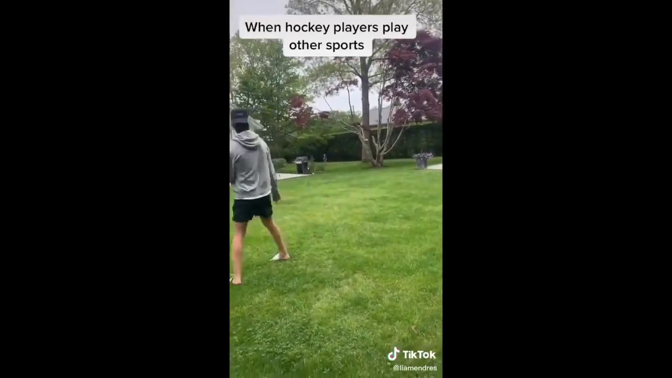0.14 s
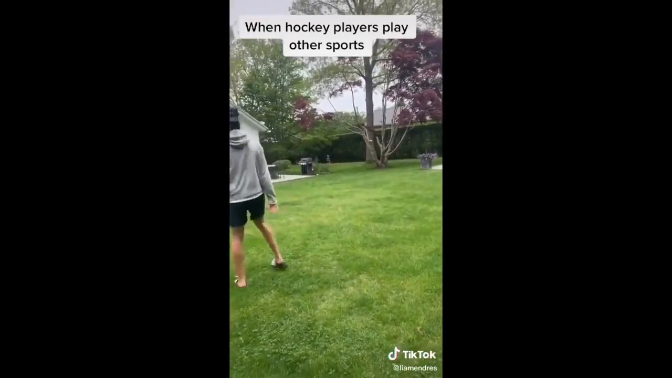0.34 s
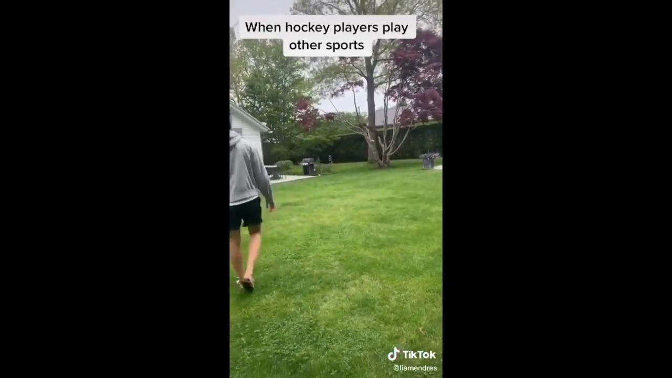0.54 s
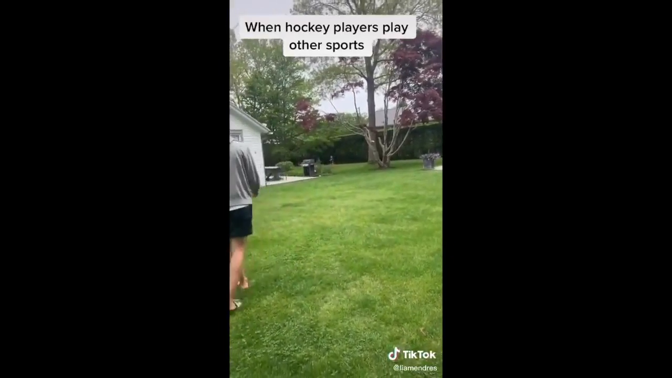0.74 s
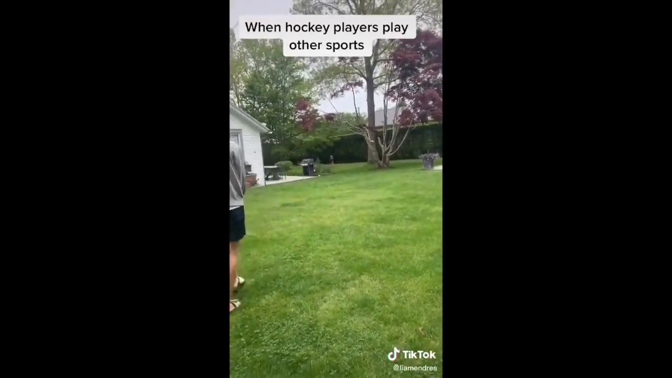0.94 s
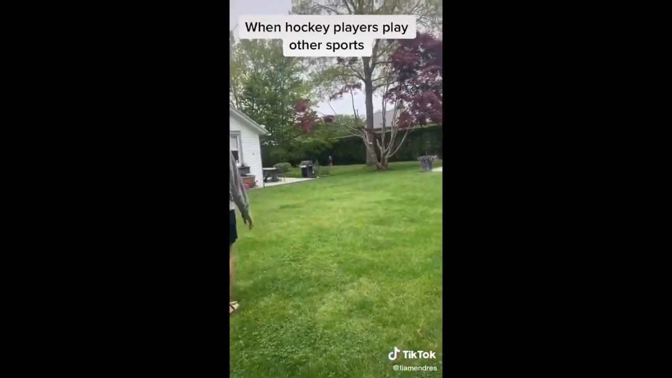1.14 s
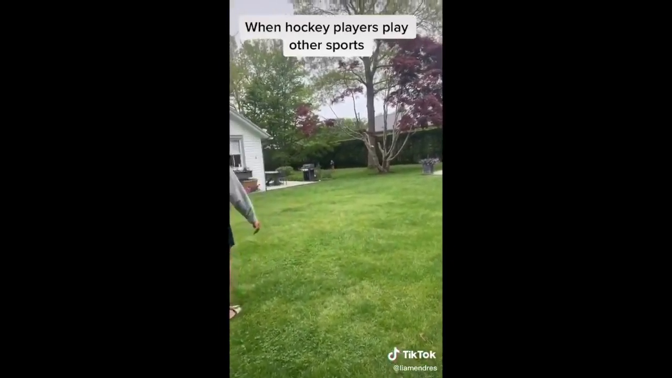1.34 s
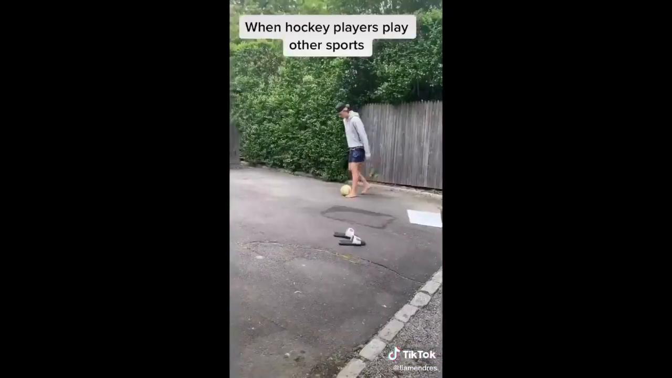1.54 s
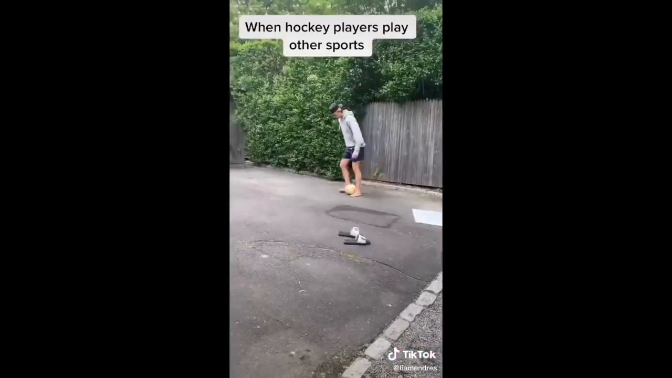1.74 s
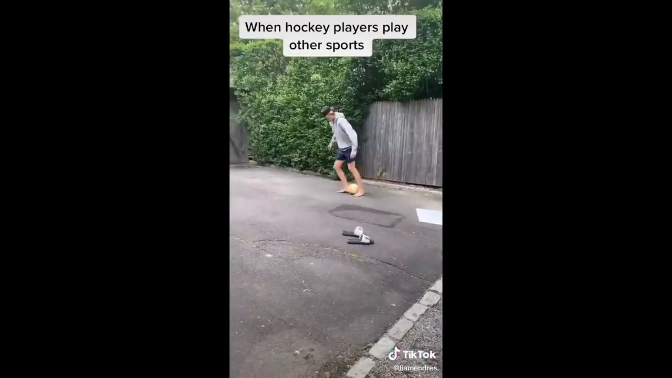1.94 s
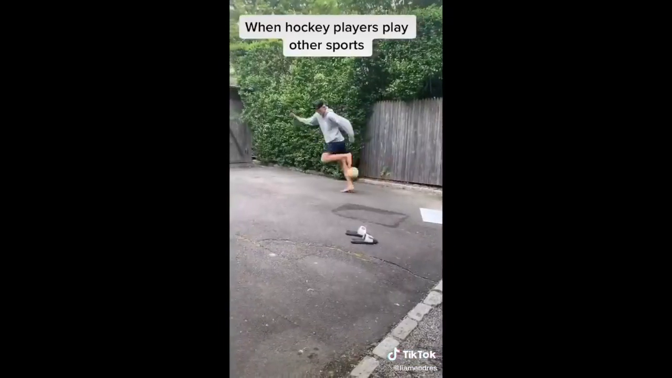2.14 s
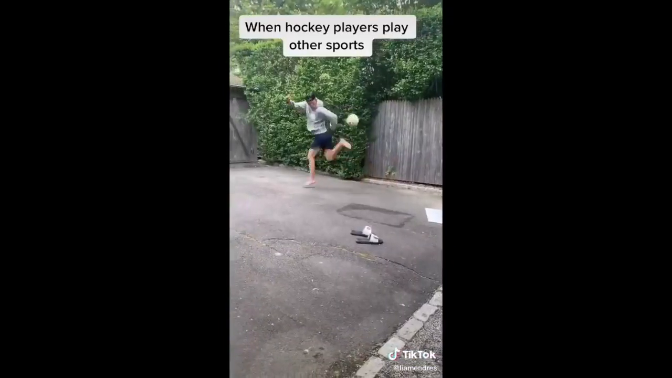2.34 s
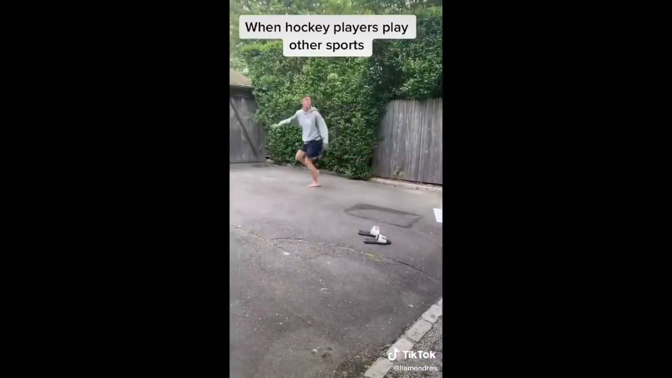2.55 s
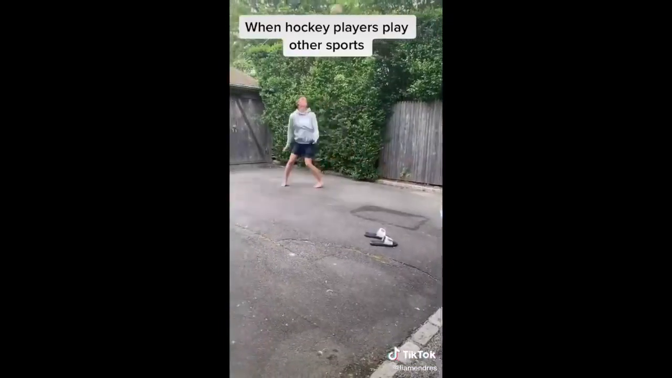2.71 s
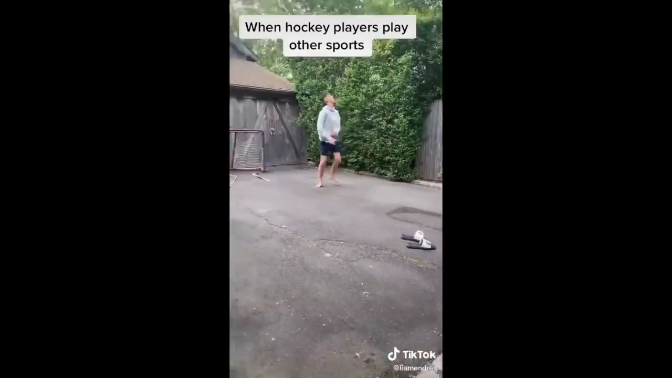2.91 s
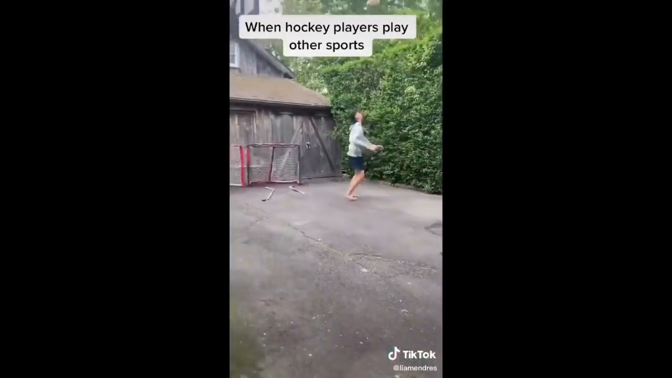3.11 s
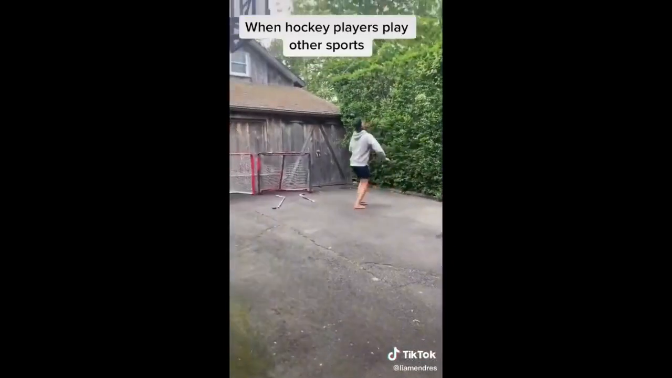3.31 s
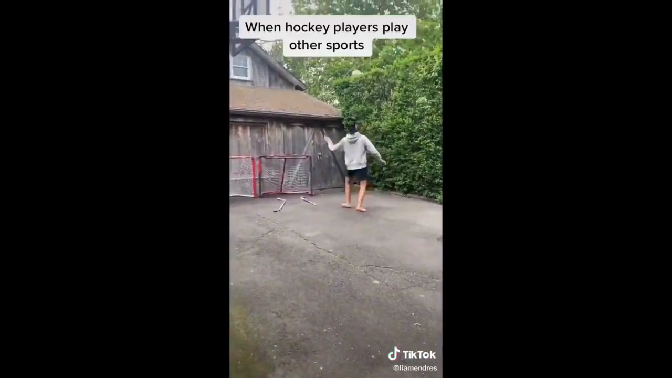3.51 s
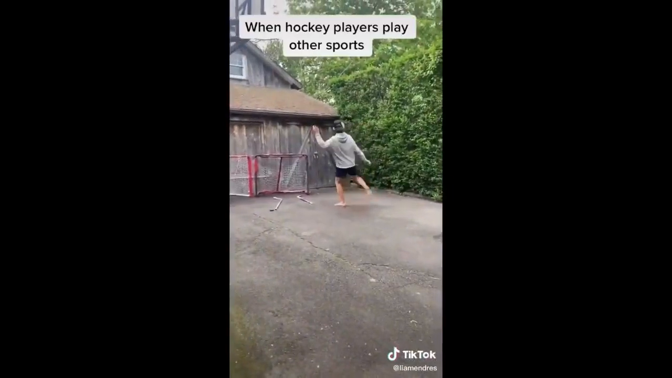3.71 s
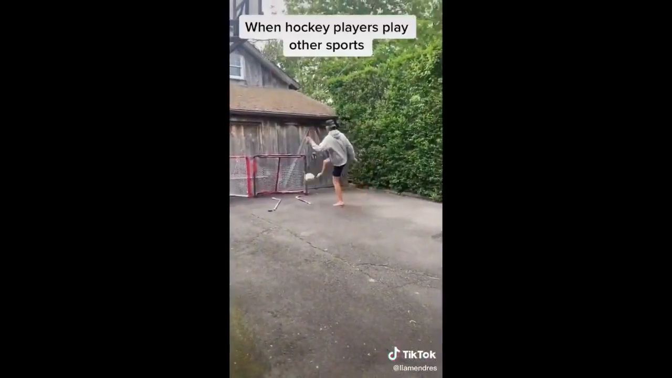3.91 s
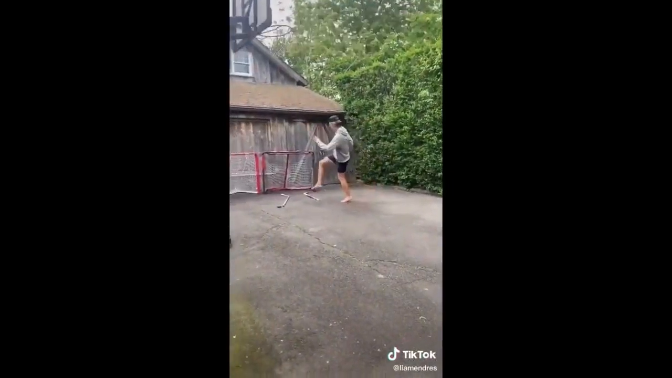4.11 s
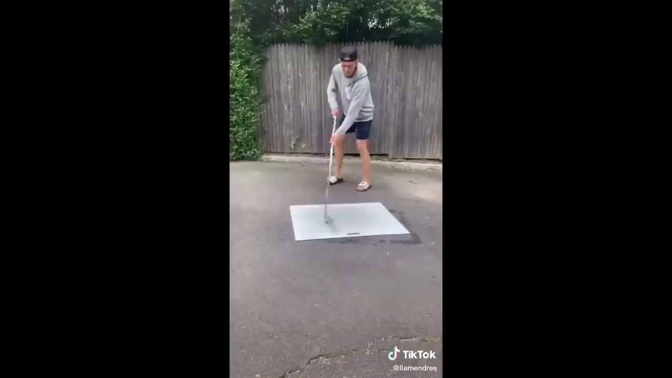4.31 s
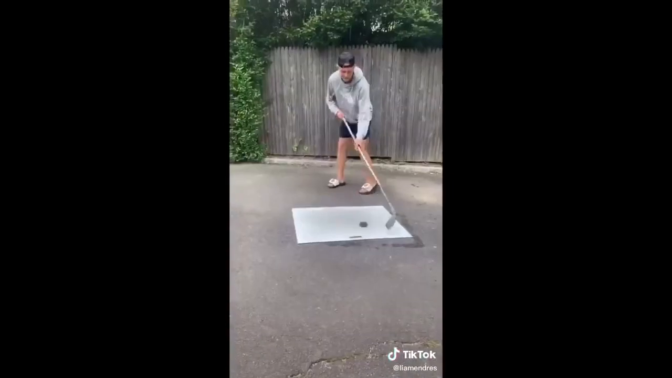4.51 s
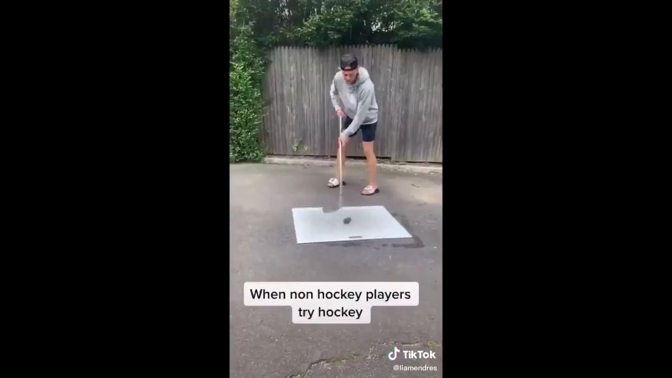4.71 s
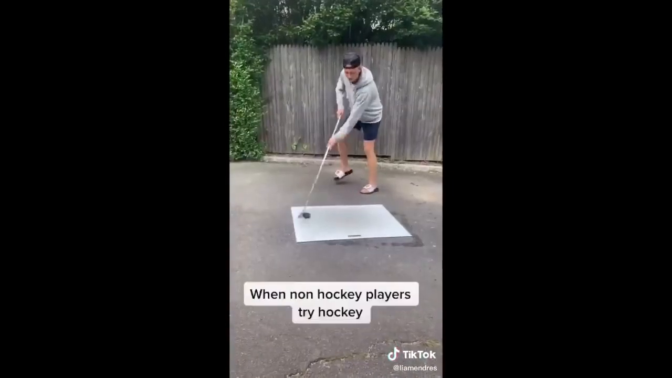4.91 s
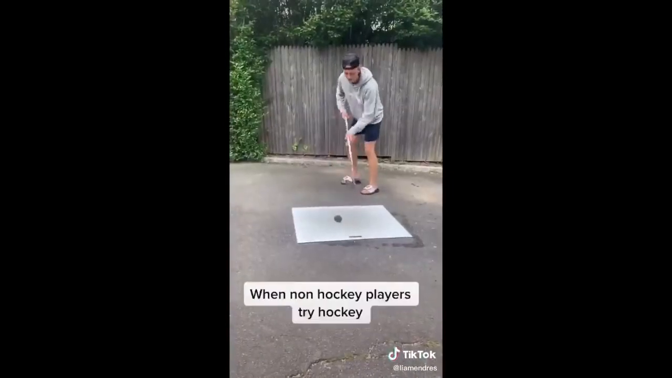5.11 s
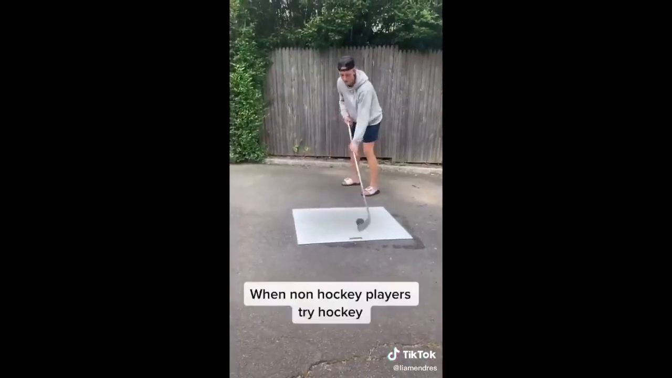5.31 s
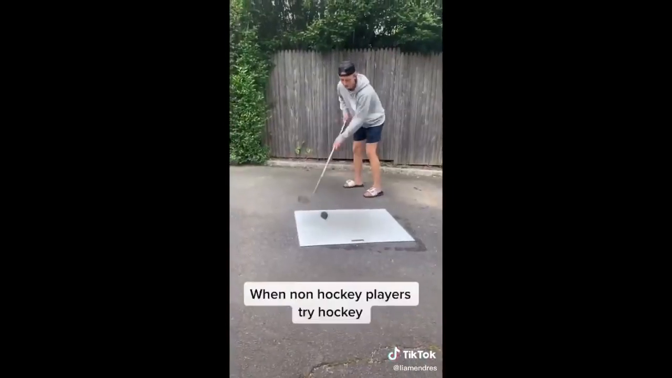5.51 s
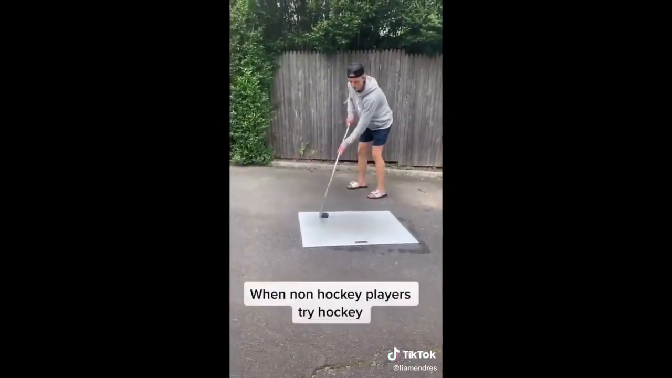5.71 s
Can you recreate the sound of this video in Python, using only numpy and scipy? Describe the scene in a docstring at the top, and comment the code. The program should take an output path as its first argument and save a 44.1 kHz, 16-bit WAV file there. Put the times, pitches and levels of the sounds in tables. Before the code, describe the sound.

Soft grass steps with birds and a faint hum, then bare-foot ball kicks on asphalt, then loud sharp stick cracks on a rattling plastic sheet.

```python
"""A garden in three parts with short silences between: steps on a lawn, bare feet kicking a ball on asphalt,
then a stick knocking a puck on a plastic sheet. Blows are damped modes plus decaying noise; friction is
grainy noise under stroke envelopes. Behind lie birds (gliding sines with noise-tail echoes), a machine hum
(wavering sine and octave) and far traffic and leaves (patchy coloured noise)."""
import sys
import numpy as np
from scipy import signal
from scipy.fft import rfft, irfft, next_fast_len
from scipy.io import wavfile
from scipy.ndimage import uniform_filter1d, map_coordinates

SR = 44100
rng = np.random.default_rng(int(sys.argv[2]) if len(sys.argv) > 2 else 0)


def bounce(signal):
    """Save signal as a 16-bit WAV file at the path given by the first command-line argument."""
    frames = np.transpose(np.atleast_2d(signal))
    limited = np.clip(frames, -1, 1)
    pcm = np.round(limited * 32767).astype(np.int16)
    wavfile.write(sys.argv[1], SR, pcm)


N = 253675

# silences closing the first two parts: (start [s], end [s])
SILENCES = [(1.374, 1.4695), (4.208, 4.2145)]


def amp(db):
    """Gain of a level in dB."""
    return 10 ** (np.asarray(db) / 20)


def unit(x):
    """x at rms 1."""
    return x / np.sqrt(np.mean(x ** 2) + 1e-20)


def along(points, hz):
    """Interpolate (Hz, value) points on a log frequency axis."""
    f, v = np.transpose(points)
    return np.interp(np.log(hz + 1), np.log(f + 1), v)


def add(track, start_s, x):
    """Mix x into track from start_s on."""
    part = track[round(start_s * SR):][:len(x)]
    part += x[:len(part)]


def wobble(rate_hz):
    """A smooth random curve, rate_hz knots a second."""
    knots = rng.standard_normal(int(N * rate_hz / SR) + 4)
    return map_coordinates(knots, [np.arange(N) * rate_hz / SR])


def rush(spectrum, patchy_db):
    """Coloured noise of rms 1 with time-frequency patches of random gain."""
    hz, _, z = signal.stft(rng.standard_normal(N + 4096), SR, nperseg=2048)
    field = uniform_filter1d(rng.standard_normal(z.shape), size=12, axis=0)
    field = uniform_filter1d(field, size=3, axis=1)
    gain_db = along(spectrum, hz)[:, None] + patchy_db * unit(field)
    return unit(signal.istft(z * amp(gain_db), nperseg=2048)[1][:N])


def burst(spectrum, decay, rise_s, tilt_db):
    """Noise that swells, then dies at each frequency's own t60; rms near 1 before swell and decay."""
    hz, t, z = signal.stft(rng.standard_normal(SR // 2), SR, nperseg=256)
    colour = amp(along(spectrum, hz) + tilt_db * np.log2(hz / 2000 + 0.012))
    fade = amp(-60 * t / along(decay, hz)[:, None])
    x = signal.istft(z * unit(colour)[:, None] * fade, nperseg=256)[1][:SR // 2]
    return x * (1 - np.exp(-(np.arange(len(x)) / SR / rise_s) ** 2))


def ring(modes, scatter_db, size=SR // 2):
    """Sum of damped sine modes (Hz, dB, t60 s), each at a randomly scattered strength."""
    t = np.arange(size) / SR
    return sum(amp(db + scatter_db * rng.standard_normal() - 60 * t / t60_s) * np.sin(2 * np.pi * hz * t)
               for hz, db, t60_s in modes)


def strokes(rows, rise_db_s, fall_db_s):
    """Gain per sample of (start s, length s, dB) strokes that swell, hold and fade."""
    t = np.arange(N) / SR
    power = 0
    for start_s, length_s, db in rows:
        rise_db = rise_db_s * np.clip(start_s - t, 0, 1)
        fall_db = fall_db_s * np.clip(t - start_s - length_s, 0, 1)
        power = power + amp(db - rise_db - fall_db) ** 2
    return np.sqrt(power)


def part_index():
    """Part of each sample: 0 lawn, 1 yard, 2 by the fence."""
    return np.searchsorted([end_s for _, end_s in SILENCES], np.arange(N) / SR)


def air():
    """Far traffic and leaves: patchy coloured noise, one colour on the lawn, another in both later parts."""
    # noise colours: (frequency [Hz], level [dB per Hz])
    lawn_spectrum = [(15, -43), (25, -10.5), (48, 3), (92, -4.5), (150, -15), (340, -17.5), (600, -20.5),
                     (1000, -18), (2400, -28), (3340, -33.5), (7000, -46.5), (11600, -49.5), (16000, -63)]
    yard_spectrum = [(15, -31), (25, -1.5), (59, 2.5), (92, -7), (123, -5), (200, -9), (301, -16.5),
                     (450, -19), (700, -23), (1100, -19.5), (2350, -24.5), (2900, -28), (3430, -42.5),
                     (5140, -43.5), (16000, -52.5)]
    # rms levels: (lawn [dB], yard [dB])
    air_db = (-41, -41.5)
    lawn = amp(air_db[0]) * rush(lawn_spectrum, patchy_db=2.0)
    yard = amp(air_db[1]) * rush(yard_spectrum, patchy_db=1.5)
    return np.where(part_index() == 0, lawn, yard)


def hum():
    """Machine hum: a sine near 120 Hz and its octave, wavering in pitch and level."""
    # base levels by part: (lawn [dB], yard [dB], by the fence [dB])
    hum_db = (-40.5, -46, -47)
    phase = 2 * np.pi * np.cumsum(120 + 1.34 * wobble(6.8)) / SR
    tone = np.sin(phase) + amp(-23) * np.sin(2 * phase)
    return amp(hum_db)[part_index()] * amp(3.5 * wobble(11)) * tone


def chips():
    """Far thin bird chips: short bursts of noise around 6-7 kHz."""
    # chips: (time [s], level [dB])
    chip_rows = [(3.03, -66), (3.3, -65), (3.551, -67), (3.68, -66), (3.8, -63), (4.045, -62)]
    out = np.zeros(N)
    spectrum = [(5500, -42), (6100, -2), (7400, -4), (8500, -35)]  # (Hz, dB per Hz)
    for start_s, db in chip_rows:
        add(out, start_s, amp(db) * burst(spectrum, [(6500, 0.63)], rise_s=0.0022, tilt_db=0))
    return out


def birds():
    """Fluttering, gliding whistles, each smeared by a decaying noise tail as echoes among the trees."""
    # single notes: (time [s], length [s], start [Hz], end [Hz], level [dB])
    note_rows = [(0.103, 0.078, 8360, 8000, -69), (0.149, 0.041, 3300, 3540, -50.5),
                 (0.225, 0.043, 3542, 3780, -52), (.27, 0.097, 2730, 2660, -44),
                 (0.313, 0.062, 4950, 4940, -62), (.67, .03, 5600, 5400, -59),
                 (0.761, .017, 4300, 4500, -58), (0.783, 0.026, 3220, 2410, -42),
                 (0.812, 0.023, 3700, 3890, -53), (.85, 0.065, 3400, 3350, -56),
                 (1.18, 0.058, 3090, 2860, -49.5), (1.224, 0.038, 2920, 2650, -45.5),
                 (3.065, 0.15, 3364, 3230, -53.5), (3.08, 0.16, 3565, 3510, -56.5),
                 (3.358, 0.11, 3310, 3300, -49), (3.37, 0.14, 3525, 3495, -56),
                 (3.595, 0.074, 3170, 3150, -49.5), (3.716, 0.052, 3095, 3060, -45.5),
                 (3.804, .08, 4900, 4880, -68), (3.84, 0.056, 3130, 3250, -48.5),
                 (3.965, 0.088, 3140, 3180, -54), (4.09, 0.051, 3200, 3200, -51)]
    # repeats of a farther bird's call: (time [s], level [dB])
    far_calls = [(2.02, -59.5), (2.402, -53.5), (2.769, -53)]
    # its whistle and upward flick:
    # (delay [s], length [s], start [Hz], end [Hz], relative level [dB], echo re note [dB])
    call_notes = [(0.0, 0.085, 5346, 5246, 2, 0), (0.034, .021, 3480, 5080, -3.5, 10)]
    middle_note_db, middle_echo_db = -54, -3
    nearer_drier = 0.5  # louder is nearer, so drier: dB of echo lost per dB of note

    notes = [(*row, middle_echo_db - nearer_drier * (row[-1] - middle_note_db)) for row in note_rows]
    for call_s, call_db in far_calls:
        for delay_s, length_s, start_hz, end_hz, rel_db, echo_db in call_notes:
            notes.append((call_s + delay_s, length_s, start_hz, end_hz, call_db + rel_db, echo_db))

    out, t = np.zeros(N), np.arange(SR // 2) / SR
    waver_hz, flutter = 22 * wobble(120), amp(2 * wobble(90))
    for start_s, length_s, start_hz, end_hz, db, echo_db in notes:
        u = np.arange(int(length_s * SR)) / (length_s * SR)
        here = slice(round(start_s * SR), round(start_s * SR) + len(u))
        hz = start_hz + (end_hz - start_hz) * u + waver_hz[here]
        swell = np.sin(np.pi * u) ** 0.3
        note = flutter[here] * swell * np.sin(2 * np.pi * np.cumsum(hz) / SR)
        tail = rng.standard_normal(len(t)) * amp(-60 * t / 0.95)  # t60 0.95 s
        echo = signal.fftconvolve(note, tail / np.linalg.norm(tail))
        add(out, start_s, amp(db) * note)
        add(out, start_s, amp(db + echo_db) * echo)
    return out


def friction():
    """Feet in grass, soles on grit, puck on sheet: bright noise roughened by quick random grains."""
    # feet brushing grass, soles dragging on grit, puck and blade gliding:
    # (start [s], length [s], level [dB])
    step_rows = [(0.0, 0.049, -58.5), (.26, 0.076, -57.5), (.464, .07, -63), (.62, 0.067, -63),
                 (.82, .05, -64.5), (1.066, .01, -64), (1.172, 0.009, -64), (1.245, .01, -65),
                 (1.284, 0.0045, -55.5), (1.35, .02, -64)]
    scrape_rows = [(1.57, 0.12, -60), (1.9, .01, -66), (1.99, .01, -63), (2.03, 0.016, -49),
                   (2.09, 0.035, -59), (2.155, 0.039, -46), (2.276, 0.014, -44.5), (2.4, 0.13, -65),
                   (2.79, 0.023, -54), (2.86, 0.23, -60), (3.3, .03, -67), (3.45, .01, -66),
                   (3.6, 0.045, -61)]
    glide_rows = [(4.23, 0.3, -40), (4.62, .1, -57), (4.72, .04, -49), (4.787, 0.016, -40),
                  (5.11, .04, -56), (5.47, 0.035, -60), (5.73, .02, -51)]
    # their colours: (frequency [Hz], level [dB per Hz])
    grass_spectrum = [(1000, -26), (2500, 1), (5000, 2), (8000, -3.5), (12000, -3.5), (16000, -17)]
    grit_spectrum = [(710, -28), (1200, -13), (2710, -1.5), (3870, -22.5), (6950, -11), (11200, -19.5),
                     (16000, -29)]
    glide_spectrum = [(180, -34), (300, -13), (440, -3.5), (1210, -8), (1360, -6.5), (3290, -7),
                      (6200, -21), (12700, -11.5), (16000, -30)]
    grass_stir_db = -71.5  # blades never quite settle between steps
    glide_rest_db = -72  # puck creeping between strokes

    steps = strokes(step_rows, rise_db_s=157, fall_db_s=253) + amp(grass_stir_db)
    scrapes = strokes(scrape_rows, rise_db_s=700, fall_db_s=384)
    glides = strokes(glide_rows, rise_db_s=300, fall_db_s=250) + amp(glide_rest_db)
    grass = steps * amp(2.0 * wobble(310)) * rush(grass_spectrum, patchy_db=3.0)
    soles = scrapes * amp(2.3 * wobble(300)) * rush(grit_spectrum, patchy_db=4.0)
    puck = glides * amp(2.0 * wobble(370)) * rush(glide_spectrum, patchy_db=1.5)
    return np.choose(part_index(), [grass, soles, puck])


def knocks():
    """Hollow knocks: one damped mode each."""
    # knocks: (time [s], frequency [Hz], level [dB], t60 [s])
    knock_rows = [(1.471, 238, -27, 0.13), (2.475, 508, -41.5, 0.18)]
    out = np.zeros(N)
    for start_s, *mode in knock_rows:
        add(out, start_s, ring([mode], scatter_db=0.5))
    return out


def ball():
    """The skin slaps and scuffs, the shell thuds, the air inside booms with a soft start."""
    # ball struck or landing: (time [s], slap [dB], scuff [dB], boom [dB], thud [dB])
    kick_rows = [(1.17, -52, -45, -57, -47), (1.282, -44, -46.5, -54, -34.5), (1.312, -60, -54, -25.5, -36),
                 (2.27, -16.5, -31.5, -26.5, -35), (2.279, -17.5, -42, -41, -28),
                 (2.305, -50, -58, -24.5, -27.5), (2.556, -36, -53, -51, -40),
                 (3.8887, -22, -24, -23.5, -21.5), (3.9031, -25, -28.5, -10, -16),
                 (3.918, -40, -42, -41, -21), (4.137, -29, -26.5, -46, -33), (4.145, -40, -19.5, -27, -22),
                 (4.163, -29, -26, -19.5, -21.5), (4.199, -44, -17, -31, -18)]
    # modes of the enclosed air, the shell on the ground, the skin: (frequency [Hz], level [dB], t60 [s])
    air_modes = [(73.6, -1.5, 0.18), (94.6, -2.5, 0.1), (142, -8, 0.1)]
    shell_modes = [(238, -4.5, 0.094), (303.3, -7, 0.094), (406, -2, 0.068), (475, -6.5, 0.05)]
    skin_modes = [(1140, -43, 0.0084), (1430, 0.5, 0.013), (1870, 0, .01), (2290, 4.5, 0.0084),
                  (3832, -24, .008)]
    # scuff colour: (frequency [Hz], level [dB per Hz])
    scuff_spectrum = [(120, -35), (200, 6.5), (465, 0), (696, -28), (1160, -4), (1590, -7), (2170, -3),
                      (4770, -27.5), (11100, -24.5), (16000, -45)]
    # scuff decay: (frequency [Hz], t60 [s])
    scuff_decay = [(300, 0.3), (2000, 0.2), (10000, 0.19)]

    out, t = np.zeros(N), np.arange(SR // 2) / SR
    slap_onset, low_onset = 1 - np.exp(-t / 0.0007), 1 - np.exp(-t / 0.0037)
    for start_s, slap_db, scuff_db, boom_db, thud_db in kick_rows:
        boom = amp(boom_db) * ring(air_modes, scatter_db=2)
        thud = amp(thud_db) * ring(shell_modes, scatter_db=3.5)
        slap = amp(slap_db) * ring(skin_modes, scatter_db=1.5)
        scuff = amp(scuff_db) * burst(scuff_spectrum, scuff_decay, rise_s=0.004, tilt_db=1.0)
        add(out, start_s, slap * slap_onset + (boom + thud) * low_onset)
        add(out, start_s, scuff)
    return out


def crack(tilt_db):
    """One blade contact: modes shifted by the contact point plus a noise snap; peak 1 in the first 2 ms."""
    # blade modes: (frequency [Hz], level before tilt [dB], t60 [s])
    blade_modes = [(1320, -5, 0.0059), (2060, -0.5, 0.0065), (3055, 3, 0.0059), (3865, -9, 0.016),
                   (4860, -10.5, 0.012), (8030, -1, 0.0067), (9880, -5.5, 0.0081), (12240, 5, 0.0037)]
    t = np.arange(SR // 30) / SR
    modes = [(hz * (1 + 0.054 * rng.standard_normal()), db + tilt_db * np.log2(hz / 2000), t60_s)
             for hz, db, t60_s in blade_modes]
    snap = np.diff(rng.standard_normal(len(t) + 1)) * amp(-6 + 2.5 * tilt_db - 60 * t / 0.006)
    onset = 1 - np.exp(-t / 0.00028)  # the contact takes a moment
    x = (ring(modes, scatter_db=3, size=len(t)) + snap) * onset
    return x / np.abs(x[:SR // 500]).max()


def stick():
    """The blade cracks on the puck; the loose sheet rattles as decaying noise and a few late slaps."""
    # blows: (time [s], crack peak [dB], rattle [dB], brightness tilt [dB per octave])
    blow_rows = [(4.2155, -11, -19.5, -2.5), (4.5085, -26, -45, -6), (4.5595, -3, -18.5, 3.5),
                 (4.5639, -1.5, -22, 0.5), (4.577, -14, -30.5, -10), (4.6201, -5.5, -24.5, -2.5),
                 (4.625, -11, -26.5, -12.5), (4.82, -23.5, -39, -11), (4.8592, -2, -24, -1),
                 (4.871, -24, -15, 4), (5.0367, -40, -33, -11), (5.186, -33, -47.5, -4.5),
                 (5.269, -34, -50, 0), (5.2734, -0.5, -17, 2), (5.2898, -6.5, -22, 3.5),
                 (5.312, -9.5, -26, -8.5), (5.494, -28, -46, -3), (5.518, -30.5, -38.5, -14),
                 (5.551, -45, -58, -4), (5.605, 1.5, -19.5, -1.2), (5.612, -26, -20.5, -1.5),
                 (5.7107, -11.5, -24, -10.5)]
    # rattle colour: (frequency [Hz], level [dB per Hz])
    sheet_spectrum = [(47, -50), (80, -6.5), (271, -9), (338, -3.5), (413, -3), (601, -9), (702, -16),
                      (1070, -7), (1670, -5), (1820, -12), (2780, -6.5), (5170, -20.5), (8230, -16),
                      (12800, -18.5), (16000, -36)]
    # rattle decay: (frequency [Hz], t60 [s])
    sheet_decay = [(150, 0.39), (400, 0.43), (1000, 0.42), (2800, 0.37), (7000, .3), (14000, 0.26)]
    rise_s, tilt_share = 0.0025, 0.29  # sheet lags; follows the blow's brightness in part

    cracks, rattle = np.zeros(N), np.zeros(N)
    for start_s, crack_db, rattle_db, tilt_db in blow_rows:
        sheet_tilt_db = tilt_share * tilt_db
        add(cracks, start_s, amp(crack_db) * crack(tilt_db))
        add(rattle, start_s, amp(rattle_db) * burst(sheet_spectrum, sheet_decay, rise_s, sheet_tilt_db))
        for late_s, drop_db in rng.random((7, 2)) * [0.07, 8]:  # the sheet slaps down again
            slap_db = rattle_db + 11.0 - drop_db - 640 * late_s
            add(rattle, start_s + rise_s + late_s, amp(slap_db) * crack(sheet_tilt_db - 6))
    return cracks + rattle * amp(1.2 * wobble(500))


def scene():
    """All sources summed to one channel."""
    background = air() + hum() + chips() + birds()
    return (background + friction() + knocks() + ball() + stick())[None]


def record(dry):
    """Round off the loudest peaks, nearly mute the silences, cut steeply around 16 kHz."""
    t = np.arange(N) / SR
    gate = np.ones(N)
    for start_s, end_s in SILENCES:
        gate *= np.clip(np.maximum(start_s - t, t - end_s) / 0.0021, 0.004, 1)  # 2.1 ms ramps
    held = dry / (1 + np.abs(dry / 0.8) ** 6) ** (1 / 6)
    m = next_fast_len(N + 4096)
    above = np.clip(np.fft.rfftfreq(m, 1 / SR) / 16000 - 0.97, 0, 1)
    return irfft(rfft(held * gate, m) * amp(-12000 * above ** 2), m)[:, :N]


dry = scene()
out = record(dry)
bounce(out)
```